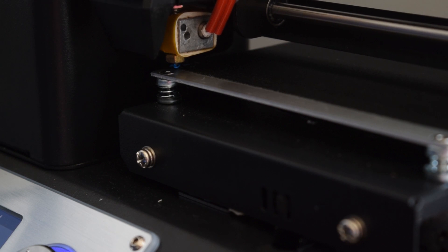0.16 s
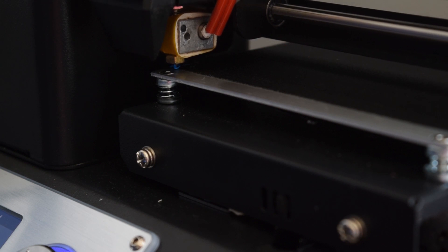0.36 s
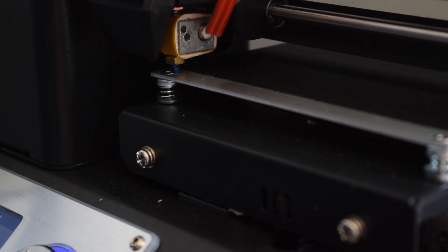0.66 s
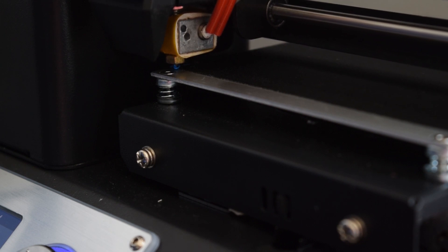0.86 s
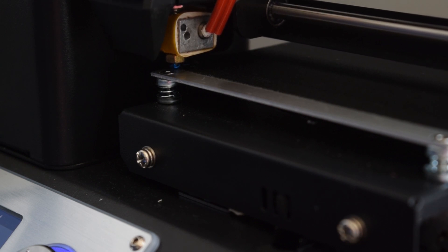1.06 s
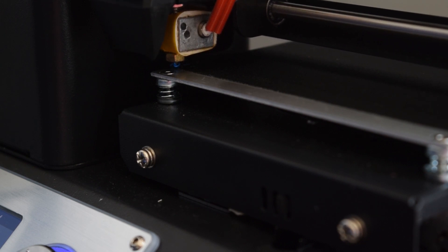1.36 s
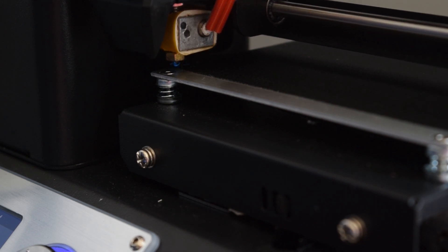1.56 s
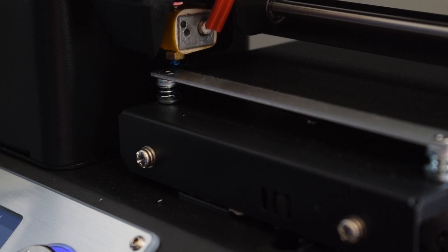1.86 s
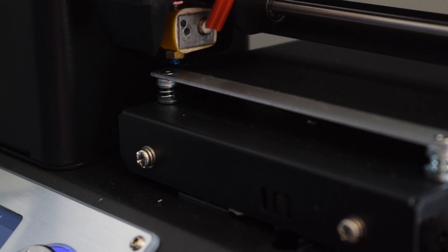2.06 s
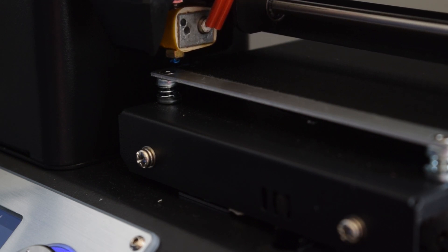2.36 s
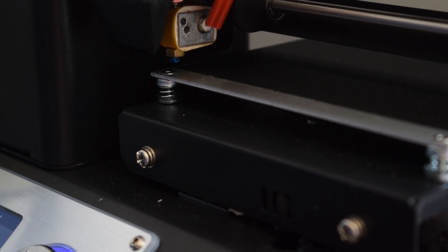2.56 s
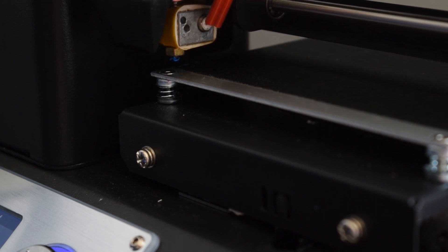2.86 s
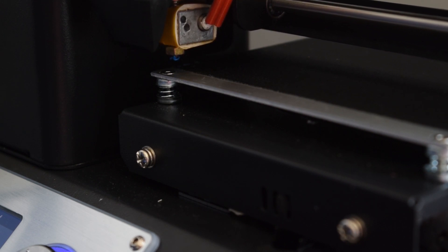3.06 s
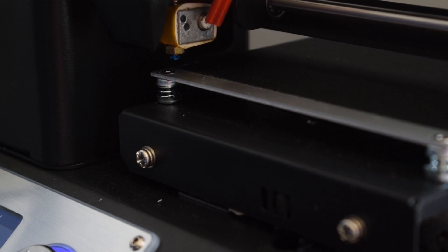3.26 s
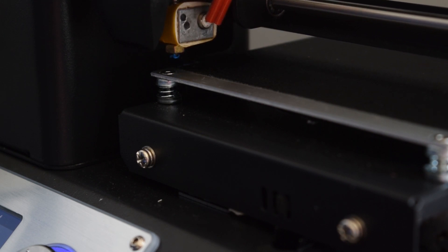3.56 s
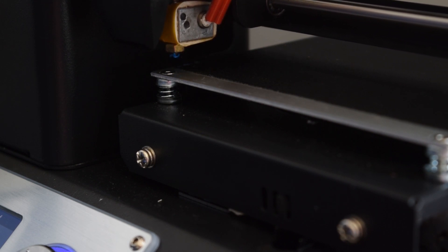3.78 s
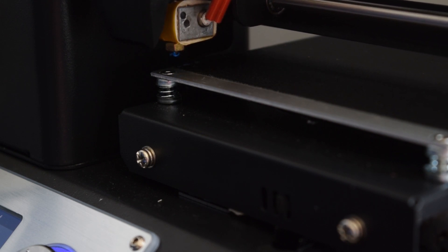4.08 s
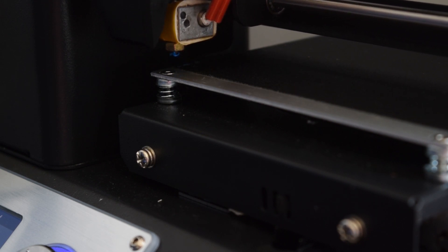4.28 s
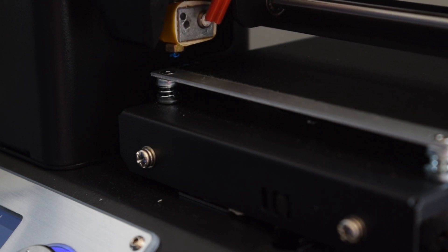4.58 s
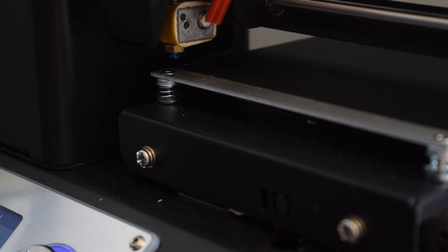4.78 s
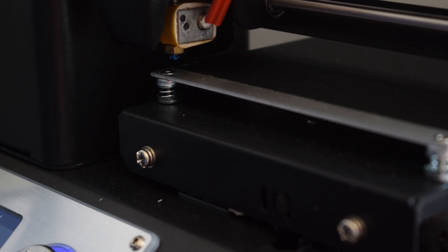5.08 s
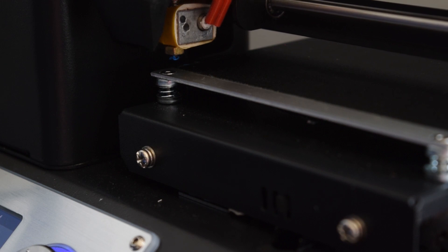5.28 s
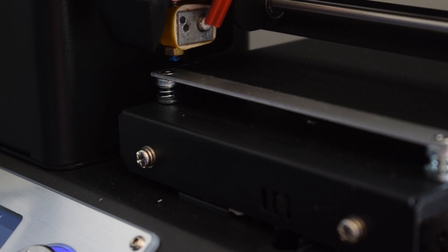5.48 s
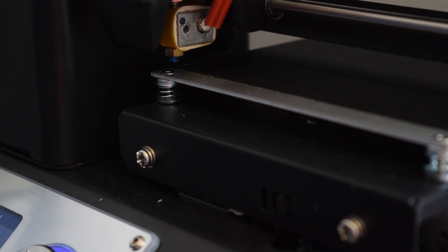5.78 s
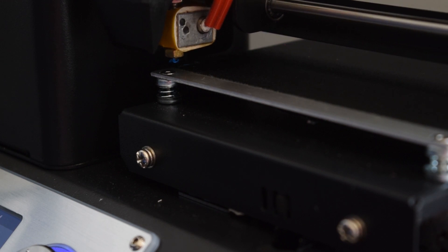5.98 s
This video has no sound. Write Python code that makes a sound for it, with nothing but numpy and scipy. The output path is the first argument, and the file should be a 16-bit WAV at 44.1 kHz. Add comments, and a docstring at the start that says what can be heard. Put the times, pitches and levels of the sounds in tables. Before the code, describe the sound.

A 3D printer's fans hum quietly throughout, heard close up at a desk, with a soft scuff at 0.2 seconds. Two light steel clicks come at about 0.5 and 0.7 seconds as the stepper motors start. The motors whine in several steady tones over a light belt rustle, with another faint scuff near 1 second. From there the same small move repeats about every 0.8 seconds, each time with slight dips in the whine and very faint, high rail squeaks. At 4.3 seconds the motors stop with a soft knock, leaving the fans, and a soft scuff follows at 4.7. At about 5.3 seconds a gust of air hits the microphone with a deep, briefly overloaded thump, far louder than everything else. Its rumble dies away by 5.8 seconds, with a last brushing scuff over the fan hum.

```python
"""At a desk, close to a 3D printer. Its fans hum while the stepper motors, which turn in tiny steps,
whine through the same small move (a lap) again and again, then stop. The carriage squeaks faintly
on its rail each lap; two light steel clicks and a few soft scuffs are also heard.
Near the end a gust of air thumps the microphone and overloads it."""
import sys
import numpy as np
from scipy.fft import rfft, irfft, next_fast_len
from scipy.io import wavfile
from scipy.ndimage import uniform_filter1d, map_coordinates

SR = 44100
rng = np.random.default_rng(int(sys.argv[2]) if len(sys.argv) > 2 else 0)


def pcm_store(signal):
    """Save signal as 16-bit PCM."""
    levels = np.round(np.clip(np.atleast_2d(signal), -1, 1) * 32767)
    wavfile.write(sys.argv[1], SR, levels.astype(np.int16).T)


N = 270271
T = np.arange(N) / SR
START_S, STOP_S = .535, 4.292  # when the motors run
LAP_START_S, LAP_S = 1.06, .784  # when the laps begin, and how long each takes


def amp(db):
    """Turn decibels into a gain to multiply by."""
    return 10 ** (np.asarray(db) / 20)


def unit(x):
    """Scale a sound to an average (rms) size of 1."""
    return x / np.sqrt(np.mean(x ** 2) + 1e-20)


def along(points, hz):
    """Read a curve through (f/Hz, level/dB) points, joined on a pitch scale."""
    freqs, levels = np.transpose(points)
    return np.interp(np.log(hz + 1), np.log(freqs + 1), levels)


def filtered(x, response):
    """Turn each frequency up or down by the gain response(hz)."""
    size = next_fast_len(N + SR // 2)
    return irfft(rfft(x, size) * response(np.fft.rfftfreq(size, 1 / SR)), size)[:N]


def noise(colour_db):
    """Noise of size 1; its colour is the balance of low and high frequencies."""
    return unit(filtered(rng.standard_normal(N), lambda hz: amp(colour_db(hz))))


def tone(hz):
    """A pure tone of size 1 that follows a pitch curve."""
    return np.sqrt(2) * np.sin(2 * np.pi * (np.cumsum(hz) / SR + rng.random()))


def wobble(rate):
    """A smooth curve through `rate` random values a second."""
    knots = rng.standard_normal(int(N * rate / SR) + 4)
    coarse = T[::32]
    return np.interp(T, coarse, map_coordinates(knots, [coarse * rate]))


def lap_wobble(rate):
    """A smooth random curve that repeats every lap."""
    knots = rng.standard_normal(max(int(rate * LAP_S), 3))
    coarse = T[::32]
    return np.interp(T, coarse, map_coordinates(knots, [coarse / LAP_S * len(knots)], mode="grid-wrap"))


def rise(s, time_s):
    """0 until time s, then climbing towards 1."""
    return 1 - np.exp(-np.maximum(T - s, 0) / time_s)


def strike(s, attack, t60):
    """A level that jumps up at time s, then fades by 60 dB in t60 seconds."""
    return rise(s, attack) * np.exp(-np.log(1000) * np.maximum(T - s, 0) / t60)


def bump(s, width_s):
    """A smooth swell of height 1 around time s."""
    return np.exp(-.5 * ((T - s) / width_s) ** 2)


def plateau(from_s, until_s, db, up_db_per_s, down_db_per_s):
    """A level that climbs, holds and falls away."""
    early_s, late_s = np.maximum(from_s - T, 0), np.maximum(T - until_s, 0)
    return amp(db - up_db_per_s * early_s - down_db_per_s * late_s)


def each_lap(at_s, width_s, period=LAP_S):
    """A bump that keeps coming back while the laps go on."""
    offset = (T - LAP_START_S - at_s + period / 2) % period - period / 2
    return np.exp(-.5 * (offset / width_s) ** 2) * (T > LAP_START_S) * (T < STOP_S)


def lap_swell(at_s):
    """A swing between -1 and 1 that peaks at_s into every lap."""
    return np.cos(2 * np.pi * (T - LAP_START_S - at_s) / LAP_S)


def running(take_up_s=.025, run_down_s=.012):
    """1 while the motors drive: the belt takes up at the start, and they run down at the stop."""
    return rise(START_S, take_up_s) * (1 - rise(STOP_S, run_down_s))


def hesitations():
    """1 where the motors hesitate between the seven short parts of a lap."""
    return each_lap(at_s=.385, width_s=.017, period=LAP_S / 7)


# Pitches that the case's panels boost or weaken: f/Hz, width/Hz, level/dB
CASE_PANELS = [(148, 10, 5.5), (300, 62, 2), (425, 99, 3.5), (635, 56, 3), (690, 40, -11.5), (810, 50, 0),
               (920, 59, 9), (1020, 54, -5), (1227, 30, 4.5), (1704, 80, -4), (1846, 120, 3.5),
               (2810, 430, -3.5), (5900, 400, -2)]
def housing(hz):
    """The colour, in dB, that the panels give to noise inside the printer."""
    return sum(db / (1 + (2 * (hz - centre) / width) ** 2) for centre, width, db in CASE_PANELS)


# Colour of the fans' air: f/Hz, level/dB
AIR_COLOUR = [(12, -33.5), (20, 4.5), (81, -8.5), (113, -11), (203, -9.5), (268, -20), (419, -11.5),
              (603, -16.5), (674, -16), (916, -21), (1020, -18), (1350, -20.5), (2720, -29), (3040, -28.5),
              (15800, -57.5)]
def fan_air():
    """Air blows through the case with a fine hiss on top; both slowly grow a little louder."""
    air = amp(-54.6 + .12 * T - 1.2 * running()) * noise(lambda hz: along(AIR_COLOUR, hz) + housing(hz))
    hiss_colour = [(2000, -34), (5000, -12), (8000, -12.5), (15000, -21.5)]
    return air + amp(-76.3 + .68 * T) * noise(lambda hz: along(hiss_colour, hz))


# Early swells of the low drone: t/s, level/dB
DRONE_SWELLS = [(.14, -57), (.32, -57.5), (.68, -55), (1.1, -65)]
def drone(rest_db=-69):
    """A low drone swells a few times before the laps settle."""
    level = amp(rest_db) + sum(amp(db) * bump(s, width_s=.04) for s, db in DRONE_SWELLS)
    colour = [(20, -15), (45, -4), (60, -11), (76, 5.5), (100, -19), (200, -46.5), (1000, -120)]
    return level * noise(lambda hz: along(colour, hz))


# Weak tones of the fans and the frame: f/Hz, level/dB
HUM_TONES = [(76, -71.5), (242, -68), (441, -69), (565, -77.5)]
def fan_hum(blade_hz=197.1, idle_hz=915, dip_s=.61):
    """The fan blades make one firm tone, which dips once, among weaker wavering tones."""
    blade_db = np.where(T < dip_s, -54, -55.2) - 15 * bump(dip_s, width_s=.028)
    out = amp(blade_db + .3 * wobble(15)) * tone(blade_hz * (1 + .0014 * wobble(7.4)))
    # a higher tone sounds whenever the motors rest or hesitate
    idle = amp(-66) * hesitations() + amp(np.where(T < STOP_S, -74, -66.5)) * (1 - running())
    out += idle * amp(.5 * wobble(41)) * tone(idle_hz + 2.75 * wobble(15))
    for hz, db in HUM_TONES:
        out += amp(db + 3 * wobble(8.2)) * tone(hz + 4 * wobble(13))
    return out


# Soft scuffs: t/s, level/dB, fade time/s, middle f/Hz, width/octaves
SOFT_SCUFFS = [(.195, -65, .45, 9200, 0.18), (.2, -61, 0.37, 4800, 0.32), (.98, -66, .4, 7500, .6),
               (4.683, -58, 0.39, 7100, 0.32), (5.761, -54, 0.4, 7900, 0.12),
               (5.761, -54.5, 0.45, 6100, 0.13), (5.761, -55.5, 0.21, 10800, 0.19),
               (5.761, -54.5, 0.36, 2310, 0.33)]
def scuffs():
    """Short brushing hisses, each around its own pitch."""
    out = np.zeros(N)
    for s, db, t60, centre_hz, width in SOFT_SCUFFS:
        hiss = noise(lambda hz: -10 * np.log10(1 + (np.log2((hz + 1) / centre_hz) / width) ** 4))
        out += amp(db) * strike(s, attack=.011, t60=t60) * hiss
    return out


# Pitches at which the steel parts ring: f/Hz, level/dB
STEEL_RINGS = [(3300, -10), (5230, 5), (5600, 0), (6500, -3), (7400, -8), (8700, -15), (9700, -12),
               (10870, -7), (11300, -12), (12500, -8), (13050, -11), (15550, -12)]
# Colour of a click's sharp crack: f/Hz, level/dB
CRACK_COLOUR = [(500, 8), (900, -3), (1250, 17), (1650, -2), (2100, 10.5), (3000, -11), (5500, -1),
                (6600, -2), (8000, -16), (10300, -1), (13000, -21), (15500, -4)]
# The clicks: t/s, crack level/dB, ring level/dB
STEEL_CLICKS = [(.530, -50, -65), (0.737, -56, -51.5)]
def clicks(ring_width_hz=100):
    """Loose steel parts click as the move begins and ring briefly in clusters of close pitches."""
    def ring_colour(hz):
        power = sum(amp(db) ** 2 / (1 + ((hz - f) / ring_width_hz) ** 4) for f, db in STEEL_RINGS)
        return 10 * np.log10(power + 1e-4)

    out = np.zeros(N)
    for s, crack_db, ring_db in STEEL_CLICKS:
        out += amp(ring_db) * strike(s, attack=.001, t60=.2) * noise(ring_colour)
        crack = noise(lambda hz: along(CRACK_COLOUR, hz) + housing(hz))
        out += amp(crack_db) * strike(s, attack=.001, t60=.16) * crack
    return out


def carriage():
    """The moving carriage rocks the frame and swells a low hum each lap, then stops with a soft knock."""
    sway = noise(lambda hz: along([(4, 1.5), (14, -8), (35, -14.5), (120, -67)], hz))
    sway *= amp(-47) * (each_lap(at_s=.28, width_s=.031) + .34)
    hum = amp(-54.5) * each_lap(at_s=.57, width_s=.027) * tone(77 + 2 * wobble(3.4))
    thud = noise(lambda hz: along([(40, 7), (200, -7), (1200, -20), (4000, -45)], hz))
    return sway + hum + amp(-44.5) * strike(STOP_S, attack=.002, t60=.21) * thud


# Squeaks of one lap: t/s into the lap, length/s, start f/Hz, middle f/Hz, end f/Hz, level/dB
RAIL_SQUEAKS = [(.27, 0.051, 9900, 10100, 9950, -83), (.315, .055, 9900, 10400, 10780, -76),
                (.425, .075, 9400, 9850, 8750, -80)]
def squeaks():
    """The carriage squeaks on its rail in thin, sliding tones."""
    out = np.zeros(N)
    for lap_s in np.arange(LAP_START_S, STOP_S - LAP_S / 2, LAP_S):
        for s, length, start_hz, middle_hz, end_hz, db in RAIL_SQUEAKS:
            progress = np.clip((T - lap_s - s) / length, 0, 1)
            glide_hz = np.polyval(np.polyfit([0, .5, 1], [start_hz, middle_hz, end_hz], 2), progress)
            arch = np.sqrt(np.abs(np.sin(np.pi * progress)))
            out += amp(db) * arch * tone(glide_hz + 50 * wobble(400))
    return out


# Colour of the belt and bearings: f/Hz, level/dB
BELT_COLOUR = [(60, -14), (150, -2.5), (260, -3.5), (420, -6.5), (620, -2), (850, -6.5), (1180, -1.5),
               (1400, -16), (1700, -18.5), (2350, -11.5), (2800, -16), (4800, -27.5), (6600, -27.5),
               (12000, -33.5)]
# Colour of the motor coils' buzz: f/Hz, level/dB
COIL_COLOUR = [(2500, -10), (4300, 11), (4750, -17), (5000, -36), (5450, 14), (6100, -21), (6650, 5),
               (7100, -3), (7900, 9.5), (9500, -7), (15000, -10)]
def belt_and_coils(step_hz=139.9):
    """The belt rustles and the coils buzz, both pulsing with each motor step."""
    step = np.cos(2 * np.pi * step_hz * T)
    strain_db = 2.5 * bump(.58, width_s=.05)  # the belt strains as the motors speed up
    belt_db = -61.6 + strain_db + .7 * lap_swell(at_s=.12) + 1.5 * step + 1.2 * lap_wobble(40)
    belt = amp(belt_db) * noise(lambda hz: along(BELT_COLOUR, hz) + housing(hz))
    buzz_db = -78.3 - 8 * hesitations() + 3 * step + 1.5 * lap_wobble(12)
    buzz = amp(buzz_db) * noise(lambda hz: along(COIL_COLOUR, hz))
    return running() * (belt + buzz)


# Tones that make up the motors' whine: f/Hz, base level/dB
WHINE_TONES = [(419.9, -55), (559.9, -74), (699.8, -66), (742.9, -72), (909.8, -76), (979.8, -78),
               (1023, -72), (1120, -72), (1163, -62), (1303, -79), (1443, -77), (1583, -75.5),
               (1863, -79.5), (2196, -83.5), (2466, -84), (2880, -89), (3165, -88), (3736, -88),
               (4005, -91), (4603, -90), (4743, -83), (4883, -90), (5163, -91), (5351, -89), (5626, -90),
               (6600, -94), (7908, -94)]
def stepper_whine(full_speed_s=.655):
    """Motor steps shake the frame into tones, which sag in pitch at the two turns of a lap."""
    turn = each_lap(at_s=.386, width_s=.016, period=LAP_S / 2) - .1
    # the lowest tone and the high ones set in at full speed; those between build up slowly
    high = rise(full_speed_s, .01)
    low = high * amp(-.7 - 5 * turn)
    middle = rise(START_S, .3)
    # high tones swell once a lap and dip most when the motors hesitate
    treble_db = 3 + 1.8 * lap_swell(at_s=.33) - 8 * (hesitations() - .25)
    out = np.zeros(N)
    for hz, db in WHINE_TONES:
        level_db = db + min(hz / 4500, 1) ** 2 * treble_db + .57 * lap_wobble(20)
        jitter_hz = 1.3 * lap_wobble(25) * np.clip(hz / 900, 1, 3)
        sag_hz = 6 * turn * min(hz / 1100, 2)
        drive = low if hz < 500 else middle if hz < 4000 else high
        out += drive * amp(level_db) * tone(hz + jitter_hz - sag_hz)
    return running() * out


def swirls(colour, evenness=.54, cutoff_hz=2000):
    """The rumble of swirling air, evened out so that the swirls are about equally strong."""
    rumble = noise(lambda hz: along(colour, hz) - 20 * np.log10(1 + (hz / cutoff_hz) ** 2))
    power = np.abs(uniform_filter1d(rumble ** 2, size=1700)) + 1e-4
    return unit(rumble / uniform_filter1d(power, size=900) ** evenness)


# Colours of the gust's main swirls, small swirls and hiss: f/Hz, level/dB
MAIN_SWIRLS = [(8, -14.5), (20, 7), (38, 5), (55, -9), (80, -15), (130, -30), (400, -80.5)]
SMALL_SWIRLS = [(30, -10.5), (65, 1), (105, -5), (170, -21), (250, -38), (450, -53), (1000, -67.5),
                (3000, -100)]
HISS_COLOUR = [(500, 0), (1800, 2), (3000, -7), (4800, -5), (7000, -10), (11500, -11), (15500, -21)]
# Its short core, longer body and hiss: hold from t/s, until t/s, level/dB, climb/(dB/s), fall/(dB/s)
CORE_SHAPE = (5.375, 5.395, -11.5, 300, 230)
BODY_SHAPE = (5.26, 5.45, -17.5, 520, 76)
HISS_SHAPE = (5.405, 5.49, -57.3, 140, 65)
# Blasts of air: middle t/s, length/s, pressure/full scale (below zero is suction)
AIR_BLASTS = [(5.2715, 0.0155, 3.6), (5.294, .02, -1.3), (5.376, .011, -.8), (5.4212, 0.0115, 1.07)]
# Slow pressure swings that the blasts leave: t/s, level/dB, f/Hz, fade time/s
PRESSURE_SWINGS = [(5.313, 2, 45, 0.48), (5.662, -17, 17.4, 0.46)]
def gust(calm_s=5.76, flow_limit=.95):
    """Blasts of air hit the microphone amid low swirls and a faint hiss."""
    strength = (plateau(*CORE_SHAPE) + plateau(*BODY_SHAPE)) * (1 - rise(calm_s, .02))
    strength += amp(-45) * bump(6.0, width_s=.08)  # one last weak swirl
    # small swirls die first after the last blast, leaving a deep rumble
    since_blast_s = np.maximum(T - AIR_BLASTS[-1][0], 0)
    small = amp(-4.5 - 40 * since_blast_s) * swirls(SMALL_SWIRLS)
    flow = strength * (swirls(MAIN_SWIRLS) + small)
    for s, db, hz, t60 in PRESSURE_SWINGS:
        flow += amp(db) * strike(s, attack=.011, t60=t60) * np.sin(2 * np.pi * hz * (T - s))
    # the air's speed limits its pressure, so only the blasts crackle
    flow /= (1 + (flow / flow_limit) ** 4) ** (1 / 4)
    # each blast sweeps the swirls aside while it lasts
    for s, length, pressure in AIR_BLASTS:
        blast = np.cos(np.pi * np.clip((T - s) / length, -.5, .5)) ** 2
        flow = flow * (1 - blast) + pressure * blast
    hiss = plateau(*HISS_SHAPE) * amp(1.2 * wobble(70)) * noise(lambda hz: along(HISS_COLOUR, hz))
    return flow + hiss


def scene():
    """The printer and the gust at one microphone."""
    background = fan_air() + drone() + fan_hum()
    motion = stepper_whine() + belt_and_coils() + carriage() + squeaks()
    return (background + motion + clicks() + scuffs() + gust())[None]


def record(dry, top_hz=15800):
    """Overload flattens any peak beyond full scale, then the highest treble is cut away."""
    clipped = np.clip(dry[0], -1, 1)
    return filtered(clipped, lambda hz: hz < top_hz)[None]


dry = scene()
out = record(dry)
pcm_store(out)
```